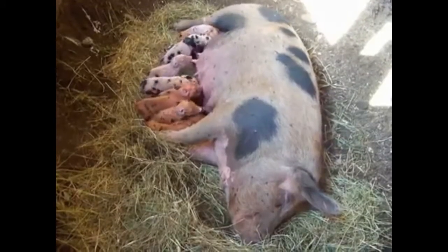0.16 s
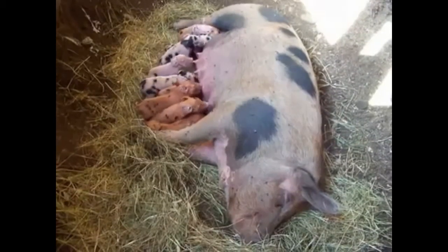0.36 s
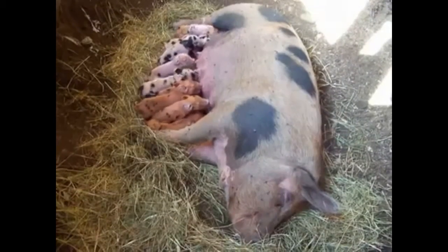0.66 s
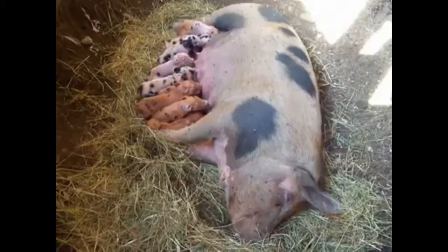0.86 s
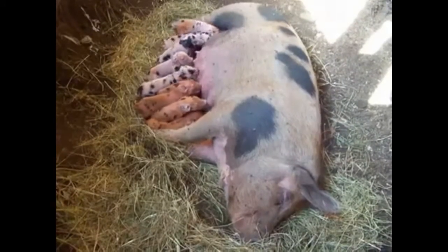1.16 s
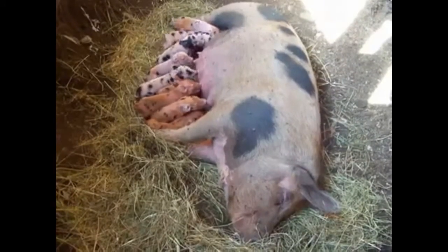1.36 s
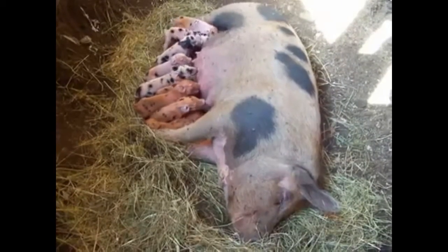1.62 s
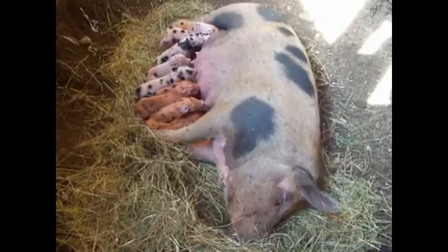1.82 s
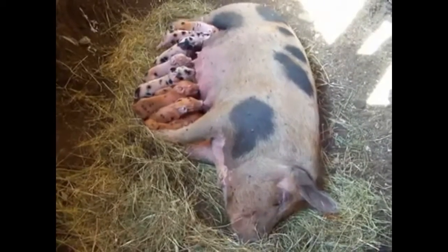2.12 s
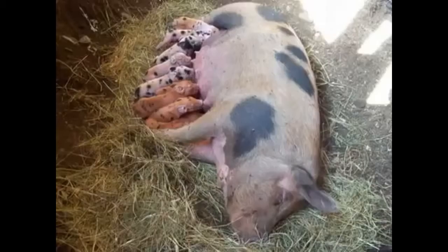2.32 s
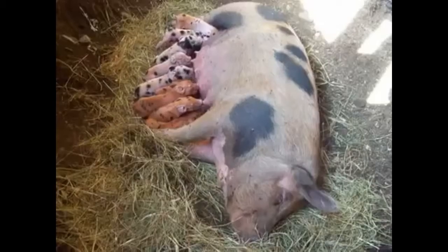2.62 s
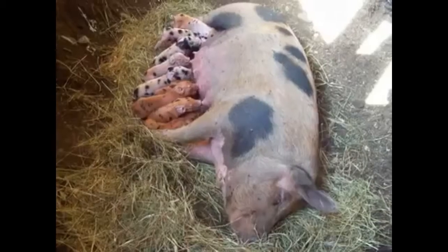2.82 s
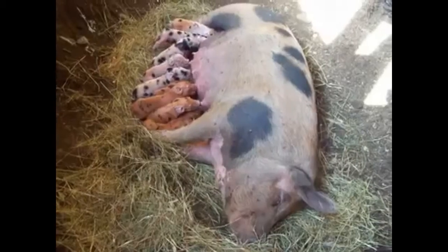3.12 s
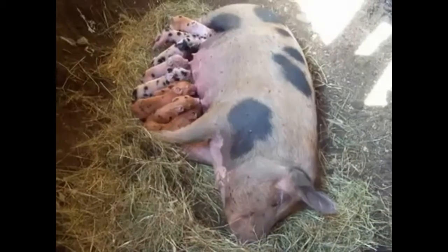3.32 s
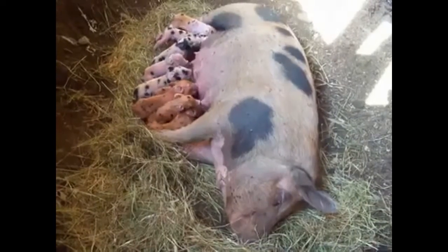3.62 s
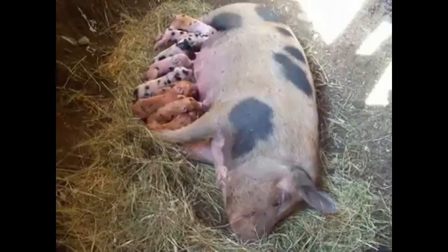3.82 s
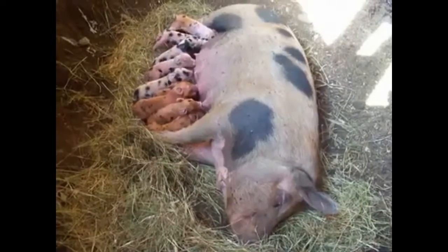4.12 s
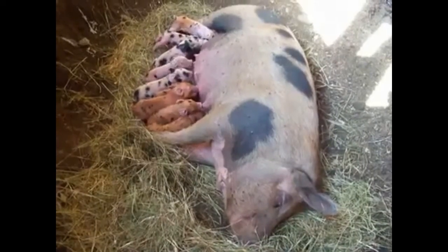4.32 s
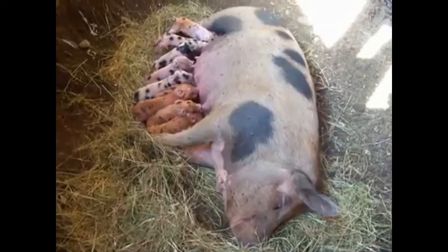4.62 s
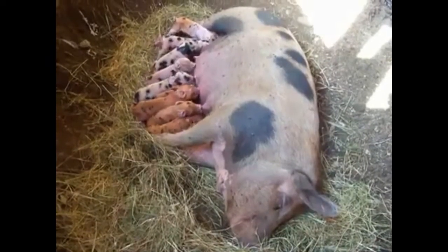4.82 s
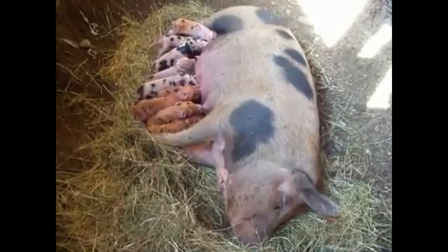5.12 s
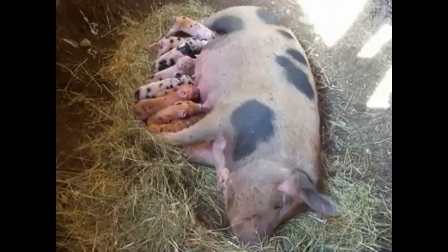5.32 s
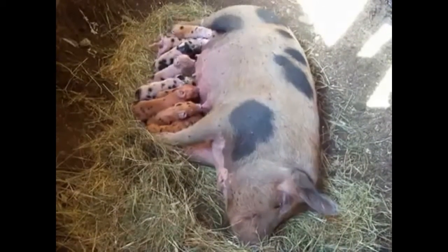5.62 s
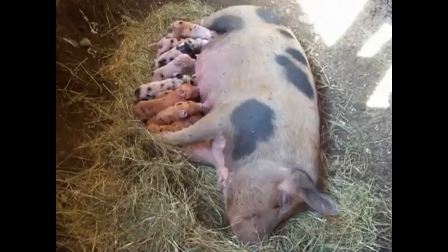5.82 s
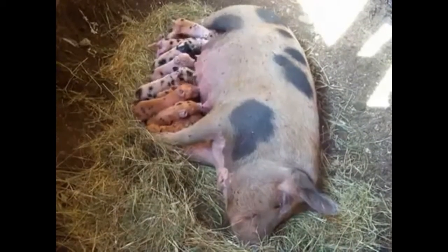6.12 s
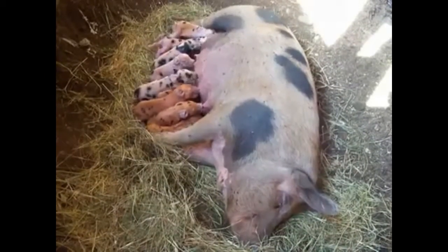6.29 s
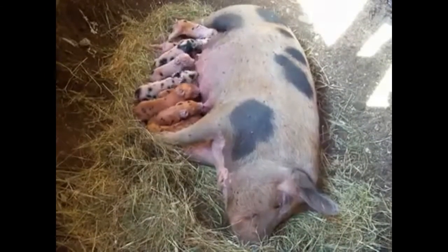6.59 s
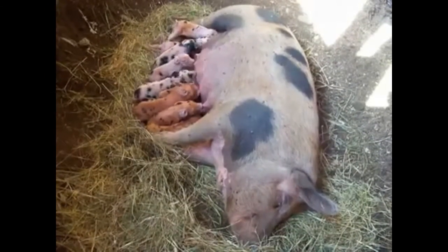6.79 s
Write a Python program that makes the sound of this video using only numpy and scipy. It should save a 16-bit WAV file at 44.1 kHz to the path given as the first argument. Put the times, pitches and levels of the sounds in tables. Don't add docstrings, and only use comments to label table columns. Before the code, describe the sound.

Deep nasal pig grunts, close and dry, each a brief train of slow guttural pulses with wet mouth snaps. Three come first, then a gap, a regular series, a crowded open-mouthed run, another short gap, and firmer, spaced grunts. Tiny bright piglet smacks and straw crackles fall between them. The small shed adds short dull reflections; steady low fan hum and soft air lie underneath, with the very top rolled off.

```python
import sys
import numpy as np
from scipy import signal
from scipy.io import wavfile

SR = 44100
rng = np.random.default_rng(int(sys.argv[2]) if len(sys.argv) > 2 else 0)


def ratio_of_db(decibels):
    return 10 ** (np.asarray(decibels, float) / 20)


def log_audio(samples):
    frames = np.atleast_2d(samples).T
    limited = np.clip(frames, -1, 1)
    pcm = np.round(limited * 32767).astype(np.int16)
    wavfile.write(sys.argv[1], SR, pcm)


N = 306495


def rms_one(x):
    return x / np.sqrt(np.mean(x ** 2) + 1e-20)


def resonance(x, hz, width_hz):
    r = np.exp(-np.pi * width_hz / SR)
    numerator = np.array([1, 0, -1]) * (1 - r * r) / 2
    return signal.lfilter(numerator, [1, -2 * r * np.cos(2 * np.pi * hz / SR), r * r], x + 1e-18)


def below_peak(away_s, swell, fade):
    slope = np.where(away_s < 0, swell, fade)
    return np.abs(slope * away_s) * (np.abs(away_s) / 0.046) ** 0.11


# first_s, last_s, flaps (count), mouth_opening (0-1)
FLAP_TRAINS = [(-.012, 0.019, 2, 1), (0.127, 0.256, 5, 0.92), (0.37, 0.502, 5, 0.99),
               (1.272, 1.312, 3, 0.36), (1.341, 1.421, 4, 0.09), (1.677, 1.728, 3, 0.38),
               (1.751, 1.809, 3, 0.02), (2.061, 2.118, 3, 0.32), (2.143, 2.191, 3, 0.1),
               (2.467, 2.624, 7, 0.34), (2.953, 3.003, 3, 0.88), (3.034, 3.121, 4, 0.35),
               (3.159, 3.185, 2, 0.9), (3.222, 3.285, 3, 0.75), (3.359, 3.485, 5, 0.91),
               (3.544, 3.728, 7, 0.77), (3.791, 3.916, 5, 0.96), (4.025, 4.128, 4, 1),
               (4.261, 4.327, 3, 0.94), (4.658, 4.706, 3, 0.16), (4.734, 4.788, 3, 0.1),
               (5.132, 5.27, 6, 0.23), (5.58, 5.718, 6, 0.28), (5.899, 6.042, 6, 0.26),
               (6.149, 6.196, 3, 0.3), (6.225, 6.311, 4, 0.09), (6.446, 6.518, 4, 0.38),
               (6.543, 6.654, 5, 0.32), (6.922, 6.948, 2, 0.5)]
# peak_s, push_db, swell_db_per_s, fade_db_per_s, nose_db
GRUNT_EFFORTS = [(.022, -27.5, 87, 57, -36), (0.208, -27, 165, 36, -36.5), (0.469, -26.5, 103, 63, -33.5),
                 (1.347, -21.5, 174.5, 118, -36), (1.752, -21.5, 198, 192, -32.5),
                 (2.132, -20, 178, 230, -29.5), (2.547, -20, 168.5, 224, -30.5),
                 (3.034, -22.5, 171, 132, -34.5), (3.231, -28.5, 125, 24, -38.5),
                 (3.427, -25, 133, 125, -34), (3.657, -22, 121, 198, -29.5), (3.871, -26, 76, 10, -36.5),
                 (4.07, -28.5, 73, 15, -38), (4.29, -29, 46, -5, -38), (4.738, -22.5, 127, 48, -40.5),
                 (5.218, -19, 166, 232, -31.5), (5.656, -17, 213, 325, -28), (5.977, -20.5, 180, 248, -33),
                 (6.232, -16.5, 273, 295, -33), (6.578, -18.5, 168, 255, -27), (6.948, -32.5, 200, 50, -44)]
# snap_s, level_db, swell_db_per_s, fade_db_per_s
HARDEST_SNAPS = [(.022, -35.5, 102, 99), (0.195, -32.5, 244, 122), (.43, -34, 26, 23),
                 (1.342, -38, 201, 143), (1.754, -38.5, 246, 296.5), (2.144, -40.5, 73, 205),
                 (2.562, -37.5, 98, 253), (3.036, -37.5, 253, 144), (3.223, -33, 216, 61),
                 (3.42, -35.5, 113, 189), (3.669, -34.5, 72, 280), (3.855, -33.5, 84, 26),
                 (4.059, -30.5, 73, 77), (4.27, -31.5, 58, 80), (4.76, -41, 75, 86),
                 (5.225, -34.5, 180, 169), (5.664, -34.5, 260, 299), (6.013, -39, 89, 404),
                 (6.232, -35.5, 156, 194), (6.584, -29, 206, 293), (6.923, -49.5, 53, 48)]


def flaps():
    times, openings = [], []
    for first_s, last_s, count, train_opening in FLAP_TRAINS:
        times.extend(np.linspace(first_s, last_s, int(round(count))))
        openings.extend([train_opening] * int(round(count)))
    s, opening = np.array(times), np.array(openings)

    pause_s = 0.0372
    grunt = np.cumsum(np.diff(s, prepend=s[0]) > pause_s)
    grunt = np.minimum(grunt, len(GRUNT_EFFORTS) - 1)
    peak_s, push_db, swell, fade, nose_db = np.array(GRUNT_EFFORTS)[grunt].T
    snap_s, snap_db, snap_swell, snap_fade = np.array(HARDEST_SNAPS)[grunt].T

    parted = 0.88
    first = (np.diff(grunt, prepend=grunt[0]) > 0) & (opening < parted)
    snap_db = snap_db + 4 * first
    opening = np.where(first, parted, opening)

    def following(lag_s, swell_share, fade_share, open_share):
        own_swell = swell * (swell_share + open_share * opening)
        own_fade = fade * (fade_share + open_share * opening)
        return below_peak(s - peak_s - lag_s, own_swell, own_fade)

    snout_db = push_db - following(lag_s=0, swell_share=1, fade_share=1, open_share=0)
    chest_db = -25.5 + 0.6 * (push_db + 22)
    chest_db = chest_db - following(lag_s=0.013, swell_share=0.58, fade_share=0.5, open_share=0.064)
    nose_db = nose_db - following(lag_s=-0.00018, swell_share=1.55, fade_share=1.7, open_share=-0.3)

    accent_db = (1 - opening) * (np.exp(-((s - snap_s) / 0.017) ** 2) - 1)
    snap_db = snap_db + accent_db - below_peak(s - snap_s, snap_swell, snap_fade)
    return np.clip(s, 0, N / SR - 0.01), opening, snout_db, chest_db, nose_db, snap_db


def puffs(at, size, decay_s, rough, recoil, shut_s):
    clicks = np.zeros(N)
    clicks[np.clip(at * SR, 0, N - 1).astype(int)] = size
    r = np.exp(-1 / (decay_s * SR))
    gate = signal.lfilter([1], [1, -r], clicks + 1e-18) * np.sqrt(1 - r * r)
    turbulence = rough * gate * rng.standard_normal(N)
    return clicks - recoil * np.roll(clicks, round(shut_s * SR)) + turbulence


def tract(at, size, modes, decay_s, rough, recoil, shut_s, spread_s=0):
    out = 0
    for k, (hz, width_hz, db) in enumerate(modes):
        scatter_db = 2 * rng.standard_normal(len(at))
        own = size * ratio_of_db(db + scatter_db)
        ring = resonance(puffs(at + k * spread_s, own, decay_s, rough, recoil, shut_s), hz, width_hz)
        out = out + resonance(ring, hz, 1.92 * width_hz) * np.sqrt(SR / width_hz)
    return out


def snaps(at, size, low_hz, high_hz):
    out, t = np.zeros(N + 1000), np.arange(1000) / SR
    decay = np.exp(-(t / 0.0031) ** 2) + 0.16 * np.exp(-(t / 0.02) ** 2)
    shape = np.minimum(t / 0.0009, 1) * decay
    chance = rng.standard_normal((len(at), 2))
    for s, height, low, (shift, pace) in zip(at, size, low_hz, chance):
        glide_s = 0.0032 * np.exp(0.32 * pace)
        hz = high_hz - (high_hz - low) * np.exp(-t / glide_s)
        phase = 2 * np.pi * np.cumsum(hz * (1 + 0.037 * shift)) / SR
        i = int(s * SR)
        out[i:i + 1000] += height * shape * np.sin(phase)
    return out[:N]


# pitch_hz, width_hz, level_db
CHEST_MODES = [(113, 72.7, 3.5), (163.1, 30, 3.5), (204.4, 28.7, 3)]
SHUT_SNOUT_MODES = [(342.4, 44, -6), (403, 105, -1), (392, 296, -3.5), (600, 79, -22)]
OPEN_SNOUT_MODES = [(343, 20, -3), (412.5, 108.5, 7), (583, 56, -10)]
SHUT_NOSE_MODES = [(856.5, 76, -3.5), (1082, 71, 3), (1199, 67, -10.5), (1610, 130, -5)]
OPEN_NOSE_MODES = [(768, 164, 4), (940, 110, -11.5), (1183, 56, -1), (1293, 45, -9)]
SHUT_MOUTH_MODES = [(2780, 100, -9), (3270, 1100, 2), (4080, 160, -4.5), (5370, 640, -7.5),
                    (6840, 530, -10.5)]
OPEN_MOUTH_MODES = [(2176, 240, 2), (2700, 190, -5.5), (3217, 190, -1.5), (4115, 160, -7),
                    (4950, 360, -12.5), (6840, 150, -16)]


def sow():
    at, opening, snout_db, chest_db, nose_db, snap_db = flaps()
    shut, wide = np.sqrt(1 - opening), np.sqrt(opening)
    early = at - 0.0042
    parting = at - 0.0006

    low = tract(at - 0.003, ratio_of_db(chest_db + 18), CHEST_MODES, 0.024, rough=0.3, recoil=0.14, shut_s=0.0081)
    low += tract(early, ratio_of_db(snout_db + 12.5) * shut, SHUT_SNOUT_MODES, 0.036,
                 rough=0.22, recoil=-0.93, shut_s=0.0081)
    low += tract(parting, ratio_of_db(snout_db + 20) * wide, OPEN_SNOUT_MODES, 0.029,
                 rough=0.2, recoil=-0.15, shut_s=0.0058)
    low += tract(early, ratio_of_db(nose_db + 16) * shut, SHUT_NOSE_MODES, 0.021,
                 rough=1.2, recoil=-0.31, shut_s=0.003406)
    low += tract(parting, ratio_of_db(nose_db + 17) * wide, OPEN_NOSE_MODES, 0.015,
                 rough=1.2, recoil=0.052, shut_s=0.005)

    snap = ratio_of_db(snap_db) * (at > 0)
    mouth = tract(at, ratio_of_db(16) * snap * shut, SHUT_MOUTH_MODES, 0.028,
                  rough=0.55, recoil=0.37, shut_s=0.0031, spread_s=0.00069)
    mouth += tract(at, ratio_of_db(16) * snap * wide, OPEN_MOUTH_MODES, 0.014,
                   rough=0.55, recoil=0.38, shut_s=0.0037, spread_s=0.0005)
    wet = ratio_of_db(14 - 13.8 * opening + 0.65 * (snap_db + 37))
    mouth += snaps(at, snap * wet, low_hz=2680 - 700 * opening, high_hz=4060)

    low = signal.sosfilt(signal.butter(3, 1920, fs=SR, output="sos"), low)
    return low + signal.sosfilt(signal.butter(4, 1900, "high", fs=SR, output="sos"), mouth)


# start_s, peak_db, centre_hz, t60_s
SMACKS_AND_STRAW = [(0.0543, -48, 4110, 0.038), (0.0955, -42.5, 6600, 0.22), (0.914, -48, 5350, 0.079),
                    (1.0594, -46.5, 4990, 0.13), (2.4658, -45, 5080, 0.46), (2.808, -34.5, 7020, 0.027),
                    (2.8575, -31.5, 5250, 0.035), (3.9164, -31.5, 6840, 0.051), (4.2408, -44, 4002, 0.071),
                    (4.3944, -51, 5720, 0.089), (4.798, -41.5, 6620, 0.065), (5.0529, -45, 6720, 0.28),
                    (5.4097, -33, 6360, 0.13), (5.5721, -27, 6230, 0.1), (6.1495, -60, 4980, 0.098)]


def piglets():
    out, t = np.zeros(N), np.arange(8000) / SR
    for s, db, hz, t60 in SMACKS_AND_STRAW:
        noise = rng.standard_normal(8000)
        colour = rms_one(resonance(resonance(noise, hz, 1900), hz, 3500))
        decay = ratio_of_db(db - 4 - 60 * t / max(t60, 0.01))
        i = int(s * SR)
        out[i:i + 8000] += colour * decay * np.minimum(t / 0.0048, 1)
    return out


# delay_ms, gain (ratio)
FLOOR_AND_WALLS = [(2.25, 0.14), (4.6, 0.35), (8.1, 0.27), (9.2, 0.25), (11., 0.14), (17.1, 0.066)]


def shed(x, t60, wall_hz, tail_db):
    t = np.arange(SR // 2) / SR
    tail = rng.standard_normal(len(t)) * ratio_of_db(-60 * t / t60) * (t > 0.012)
    tail *= ratio_of_db(tail_db) / np.sqrt(np.sum(tail ** 2))
    for ms, gain in FLOOR_AND_WALLS:
        tail[round(ms * SR / 1000)] += gain
    dulled = signal.lfilter(*signal.butter(1, wall_hz, fs=SR), tail)
    return signal.fftconvolve(x, dulled)[:N]


def drift(rate_hz):
    r = np.exp(-80 * np.pi * rate_hz / SR)
    slow = signal.lfilter([1], [1, -2 * r, r * r], rng.standard_normal(N // 40 + 2002))[2000:]
    return np.interp(np.arange(N) / 40, np.arange(len(slow)), rms_one(slow))


# pitch_hz, level_db (rms)
FAN_HARMONICS = [(59.2, -52.5), (118.4, -48), (145.3, -47.5), (242.2, -52), (360.7, -59.5), (479.1, -57),
                 (592.2, -64), (839.8, -64.5)]


def fan():
    t, out = np.arange(N) / SR, 0
    for hz, db in FAN_HARMONICS:
        level = np.sqrt(2) * ratio_of_db(db + 3.4 * drift(5.9))
        out = out + level * np.sin(2 * np.pi * hz * t + 1.33 * drift(3.86))
    return out


# pitch_hz, level_db (per Hz)
AIR_COLOUR = [(15, -55), (25, -23.5), (41, -17.5), (123, 3.5), (190, -12.5), (247, -1), (293, -49),
              (347, -24.5), (401, -29.5), (475, -11.5), (536, -19), (827, -21), (889, -22.5), (6750, -34.5),
              (7990, -36), (10400, -80), (17600, -120)]
# start_s, level_db
DRAUGHT = [
    (0.0, -49),
    (0.5, -50),
    (1.0, -53),
    (2.9, -52.5),
    (3.3, -49.5),
    (4.599, -51.5),
    (6.95, -53),
]


def air():
    out, edges = 0, 25 * 2 ** np.arange(0, 8.5, 1 / 3)
    hz, db = np.transpose(AIR_COLOUR)
    white = rng.standard_normal((2, N))
    for k, (low, high) in enumerate(zip(edges, edges[1:])):
        band = signal.sosfilt(signal.butter(2, [low, high], "band", fs=SR, output="sos"), white[k % 2])
        band_db = np.interp(np.log(low * high) / 2, np.log(hz), db)
        out = out + band * ratio_of_db(band_db + 1.2 * drift(1.6))
    s, level_db = np.transpose(DRAUGHT)
    return rms_one(out) * ratio_of_db(np.interp(np.arange(N) / SR, s, level_db) + 10)


# pitch_hz, width_hz, depth (0-1)
CANCELLED_BANDS = [(200.4, 8.3, 1), (256.4, 34, 1), (302, 30, 0.4), (531.4, 13, 0.86), (667, 8.3, 0),
                   (817, 8.3, 0), (958, 11, 0)]


def scene():
    animals = sow() + piglets()
    mix = animals + shed(animals, t60=0.16, wall_hz=1290, tail_db=-8.5) + air()
    for hz, width_hz, depth in CANCELLED_BANDS:
        mix = mix - depth * resonance(mix, hz, width_hz)
    return (mix + fan())[None]


def top_cut(x):
    return signal.sosfilt(signal.butter(12, 8140, fs=SR, output="sos"), x)


def record(dry):
    early = np.concatenate([dry[:, 500:0:-1], dry], axis=1)
    soft = signal.sosfilt(signal.butter(8, 7300, fs=SR, output="sos"), early)
    cut = signal.sosfilt(signal.cheby2(12, 25, 8250, fs=SR, output="sos"), soft)
    return top_cut(cut[:, 500:])


dry = scene()
out = record(dry)
log_audio(out)
```